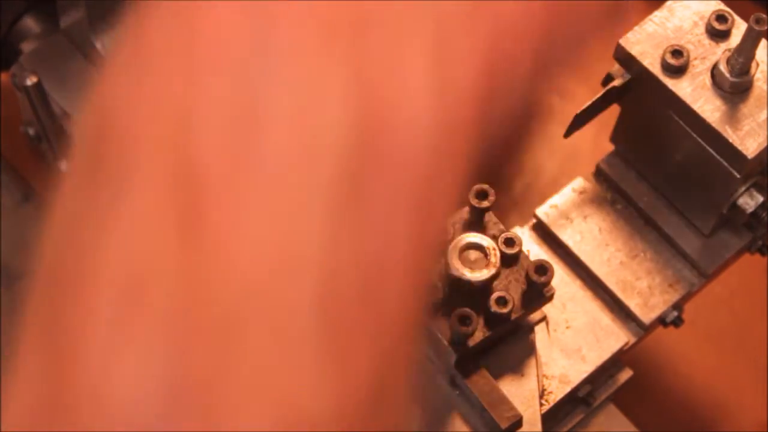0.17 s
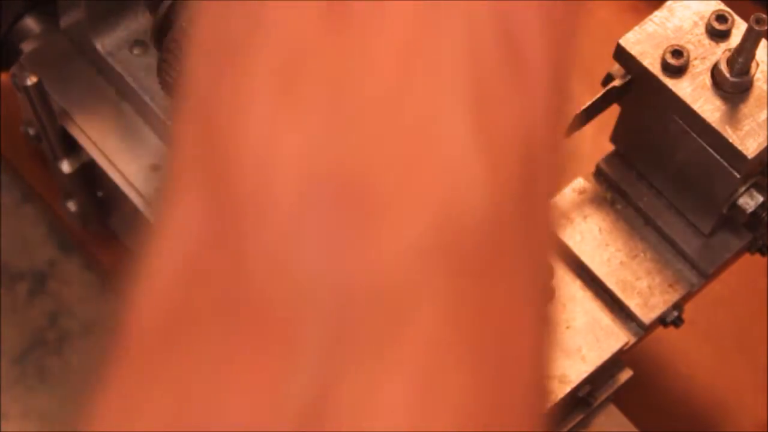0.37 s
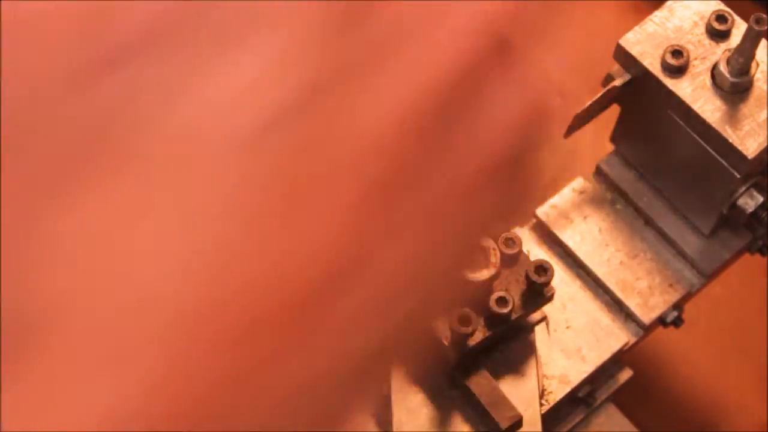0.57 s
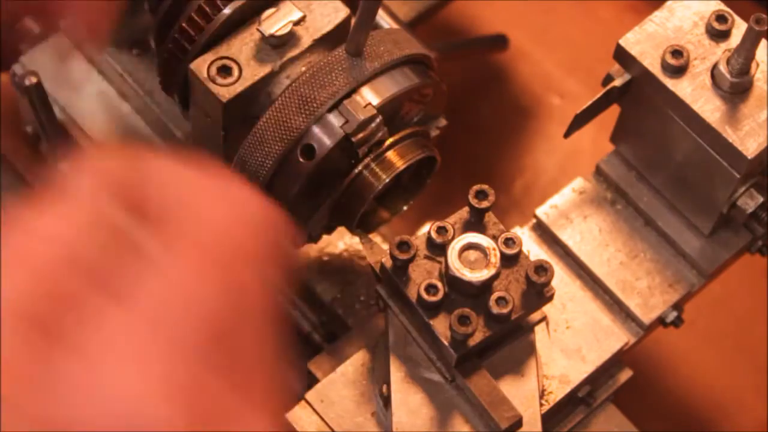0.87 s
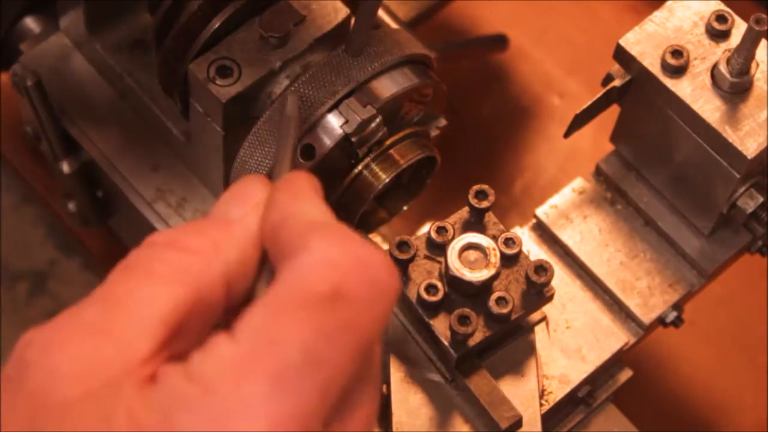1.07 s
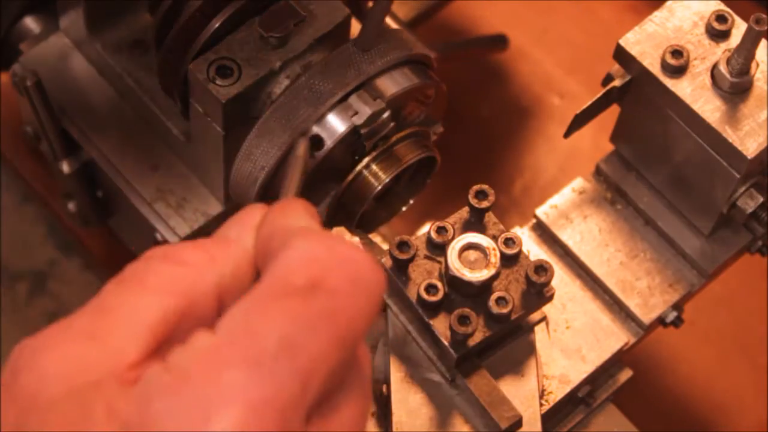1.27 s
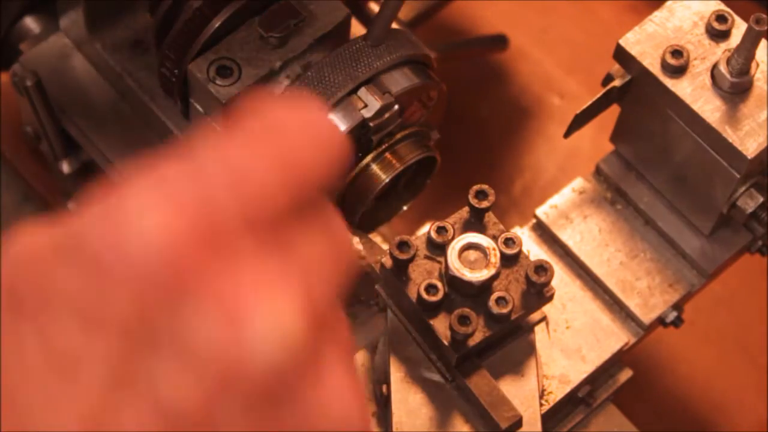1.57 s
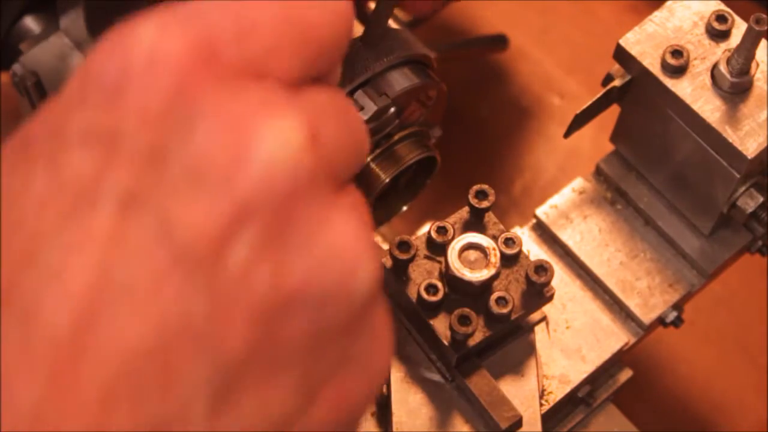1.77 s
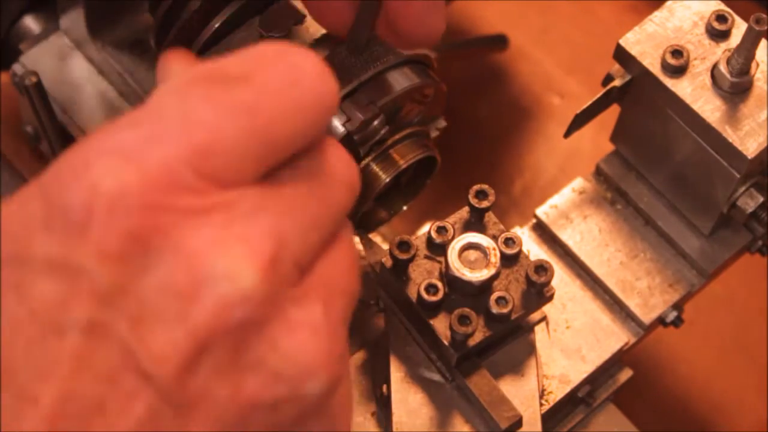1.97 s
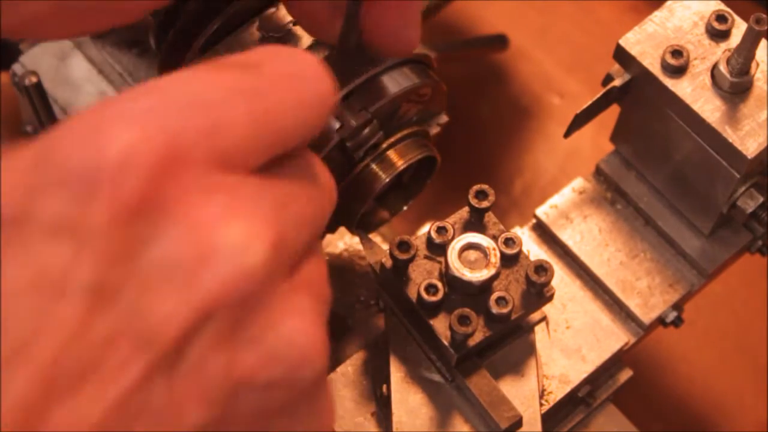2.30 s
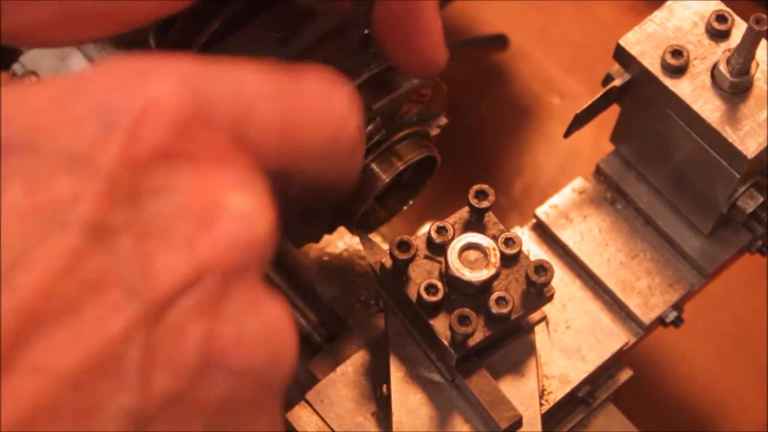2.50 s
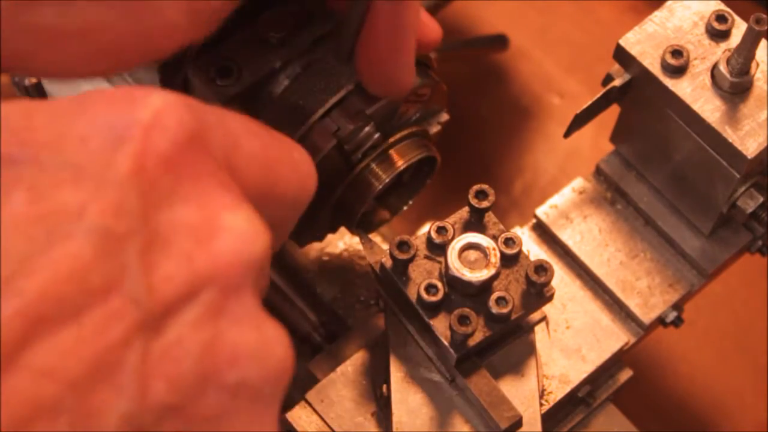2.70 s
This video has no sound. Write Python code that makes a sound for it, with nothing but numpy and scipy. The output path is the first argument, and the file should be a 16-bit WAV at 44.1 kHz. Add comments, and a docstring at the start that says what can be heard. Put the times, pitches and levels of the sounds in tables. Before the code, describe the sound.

Metallic clicks and dull clunks as hands fit a thin steel bar into a stopped lathe chuck

```python
"""A quiet workshop, close to the chuck of a stopped bench lathe: hands fit a thin steel bar into it.
Ticks are noise cracks, with decaying rings of the chuck and bar beside them; scrapes and midrange clacks
are bursts of dense grit clicks. The spindle housing answers with dull knocks (short shudders into low
modes), the hand thumps softly (puffs of bass noise), and skin and sleeve rustle as treble noise.
Mains hum (a wavering sine), room rumble and microphone hiss (shaped noise) lie underneath."""
import sys
import numpy as np
from scipy import signal
from scipy.fft import rfft, irfft
from scipy.io import wavfile
from scipy.ndimage import uniform_filter1d

SR = 44100
rng = np.random.default_rng(int(sys.argv[2]) if len(sys.argv) > 2 else 0)


def bounce(signal):
    """Save signal as a 16-bit WAV file at the path given by the first command-line argument."""
    frames = np.transpose(np.atleast_2d(signal))
    limited = np.clip(frames, -1, 1)
    pcm = np.round(limited * 32767).astype(np.int16)
    wavfile.write(sys.argv[1], SR, pcm)


def gain_from_db(level_db):
    """Turn a decibel level (scalar or array-like) into a linear amplitude factor."""
    decades = np.asarray(level_db, float) / 20
    return 10 ** decades


N = 125685

# vibration modes of the steel chuck: f/Hz, level/dB
CHUCK_MODES = [(1750, -12.5), (2105, -8.5), (2380, -14.5), (2600, -12.5), (2710, -7), (3100, -16.5),
               (3380, -13.5), (3700, -11.5), (4300, -9), (4900, -10), (7000, -15.5), (7400, -16),
               (7750, -10), (8350, -13), (9500, -11.5), (10800, -16), (12100, -41.5), (12900, -18.5),
               (14200, -17), (15000, -17)]


def colour(x, hz, octaves):
    """Bell-shaped emphasis around hz on a log axis, rms 1."""
    f = np.fft.rfftfreq(len(x), 1 / SR) + 1
    bell = np.exp(-.5 * (np.log2(f / hz) / octaves) ** 2)
    y = irfft(rfft(x) * bell, len(x))
    return y / np.sqrt(np.mean(y ** 2))


def ring(x, modes):
    """Every mode (f/Hz, level/dB, t60/s) is a decaying sine that x strikes."""
    out = 0
    for hz, db, t60 in modes:
        pole = np.exp(2j * np.pi * hz / SR - np.log(1000) / (t60 * SR))
        out = out + gain_from_db(db) * signal.lfilter([1], [1, -pole], x).imag
    return out


def add(out, s, x):
    """Mix x into out from time s."""
    i = int(s * SR)
    out[i:i + len(x)] += x[:N - i]


def walk(rate):
    """Slow random curve through rate points per second, spread about 1."""
    curve = np.interp(np.arange(N) * rate / SR, np.arange(200), rng.standard_normal(200))
    return uniform_filter1d(curve, int(SR / rate / 2)) * 1.12


def hiss():
    """Near-steady microphone and room noise, shaped over frequency."""
    # spectrum of the noise floor, relative: f/Hz, level/dB per Hz
    spectrum = [(15, -48), (25, -11), (40, -18), (58, -1), (72, -7.5), (87, -12), (110, -6), (159, -10.5),
                (197, -18), (238, -11), (273, -18.5), (349, -11), (634, -15.5), (1250, -20), (3230, -21.5),
                (8000, -25), (15600, -29.5), (16200, -52)]
    f = np.fft.rfftfreq(N, 1 / SR) + 1
    hz, db = np.array(spectrum).T
    shape = gain_from_db(np.interp(np.log(f), np.log(hz), db))
    noise = irfft(rfft(rng.standard_normal(N)) * shape, N)
    return noise / noise.std() * gain_from_db(-54 + .5 * walk(4.84))


def rumble():
    """A flickering low band of noise in the room."""
    level = gain_from_db(-63.5 + 2.5 * walk(9.44))
    return level * colour(rng.standard_normal(N), 366, 0.32)


def whine():
    """A faint, narrow band of noise in the room tone."""
    level = gain_from_db(-66 + 1.8 * walk(3.5))
    return level * colour(rng.standard_normal(N), 1300, 0.17)


def hum():
    """Mains hum: a sine of wavering pitch that swells and fades."""
    # swell of the hum, rms: t/s, level/dB
    swell = [(0.0, -74), (0.23, -54.5), (0.28, -82), (0.35, -56), (0.52, -63), (0.65, -89), (0.8, -61),
             (1.07, -57.5), (1.4, -71), (1.44, -68), (1.81, -56), (2.09, -74), (2.21, -58), (2.58, -60),
             (2.62, -84), (2.7, -54), (2.82, -84), (2.85, -76)]
    centre_hz, waver = 59, 0.035  # waver as a fraction of the pitch
    phase = np.cumsum(centre_hz * (1 + waver * walk(11.33))) * 2 * np.pi / SR
    level = gain_from_db(np.interp(np.arange(N) / SR, *np.array(swell).T))
    return np.sqrt(2) * level * np.sin(phase)


def rustle():
    """Skin and sleeve sliding over metal: flickering treble noise."""
    # level curve of each rustle, silent outside it: t/s, level/dB
    strokes = [
        [(0.8, -78), (0.802, -80), (0.852, -41), (0.874, -60), (0.9, -58)],
        [(0.9, -56), (0.99, -53.5), (1.066, -70), (1.08, -76)],
        [(1.5, -78), (1.508, -77), (1.588, -56), (1.62, -51)],
        [(1.73, -62), (1.77, -54), (1.79, -59), (1.9, -65)],
        [(2.27, -72), (2.288, -81), (2.324, -56), (2.346, -58), (2.402, -53), (2.42, -49), (2.436, -46.5),
         (2.5, -63)],
        [(2.575, -69), (2.627, -51.5), (2.649, -79), (2.655, -68)],
        [(2.74, -63), (2.748, -75), (2.782, -51.5), (2.822, -76), (2.83, -83)],
    ]
    t = np.arange(N) / SR
    gain = sum(gain_from_db(np.interp(t, *np.array(stroke).T, left=-200, right=-200)) for stroke in strokes)
    noise = colour(rng.standard_normal(N), 13500, .45)
    return gain * noise * gain_from_db(2.0 * walk(40.3))


def thumps():
    """A hand on the machine: soft, decaying puffs of bass noise."""
    # hand thumps: t/s, level/dB, f/Hz, t60/s
    hand_thumps = [(0.273, -44.5, 298, 0.14), (0.281, -41, 150, 0.061), (0.299, -43, 87, 0.18),
                   (2.371, -45, 108, 0.092), (2.621, -43, 280, 0.19), (2.623, -56, 175, 0.15),
                   (2.622, -46.5, 107, 0.3), (2.661, -42, 170, 0.053), (2.827, -52.5, 183, 0.1)]
    out = np.zeros(N)
    t = np.arange(SR // 4) / SR
    for s, db, hz, t60 in hand_thumps:
        noise = colour(rng.standard_normal(len(t)), hz, 0.27)
        onset = np.minimum(t * hz, 1)  # rises over one period
        add(out, s, gain_from_db(db - 60 * t / t60) * noise * onset)
    return out


def knocks():
    """Dull knocks: a short shudder sets the spindle housing ringing in its low modes."""
    # shudders that drive the housing: t/s, drive level/dB, length/s, f/Hz
    shudders = [(.005, -45, 0.0037, 580), (0.226, -39.5, 0.0018, 740), (.245, -32.5, 0.0036, 636),
                (.259, -28.5, 0.0048, 732), (.266, -29.5, 0.0055, 705), (.281, -40, 0.0082, 564),
                (0.648, -41.5, 0.00071, 960), (1.286, -36, 0.0051, 657), (1.294, -42, 0.00091, 690),
                (1.387, -32, 0.0091, 606), (1.398, -26, 0.0027, 994), (1.406, -32.5, 0.0044, 775),
                (1.432, -35, 0.012, 630), (1.613, -40, 0.0018, 605), (1.634, -23, 0.003, 726),
                (1.641, -24.5, 0.0055, 688), (1.657, -36, 0.0065, 796), (1.692, -26, 0.02, 614),
                (1.697, -37.5, 0.0047, 890), (1.711, -31, 0.0073, 783), (1.712, -25, 0.013, 600),
                (1.7205, -27, 0.0029, 810), (1.722, -29, 0.0085, 584), (1.759, -35, 0.0054, 470),
                (2.322, -44.5, 0.008, 610), (2.37, -44, 0.003, 600), (2.421, -47, 0.0011, 950),
                (2.5021, -37, 0.0021, 830), (2.515, -27.5, 0.01, 655), (2.529, -11.5, 0.016, 596.7),
                (2.528, -29, 0.011, 930), (2.5365, -21.5, 0.0021, 678), (2.551, -20, 0.016, 571),
                (2.553, -34, 0.0067, 920), (2.583, -38.5, 0.0067, 610), (2.604, -40, 0.0026, 613),
                (2.625, -35.5, 0.0052, 483), (2.64, -44, 0.0022, 620), (2.736, -43.5, 0.0049, 440),
                (2.835, -46, 0.0028, 580)]
    # vibration modes of the housing: f/Hz, level/dB, t60/s
    housing_modes = [(440, -7, 0.12), (580, -11.5, 0.16), (627.4, 5, 0.049), (652, -22, 0.057),
                     (757, 0.5, 0.048), (852, -7, 0.065), (915.6, -1, 0.066), (969, -5.5, 0.061),
                     (1200, -3, 0.043)]
    push = np.zeros(N)
    for s, db, length, hz in shudders:
        n = max(int(length * SR), 4)
        window = np.hanning(n + 2)[1:-1]
        shudder = window * np.sin(2 * np.pi * hz * np.arange(n) / SR)
        add(push, s, gain_from_db(db) * 2 / n * shudder)
    bass_cut = signal.butter(3, 370, "high", fs=SR, output="sos")
    return signal.sosfilt(bass_cut, ring(push, housing_modes))


def scrapes():
    """Scrapes and midrange clacks: bursts of dense grit clicks that rise and fall, direct and via the chuck."""
    # scrapes, and clacks that fill out ticks:
    # start t/s, rise/s, fall time constant/s, level/dB, centre f/Hz, width/octaves
    grit_bursts = [(0.189, 0.015, 0.031, -51, 1420, 1.7), (0.22, 0.0015, 0.035, -32.5, 5840, 2.14),
                   (.234, 0.02, 0.0044, -25.5, 5530, 1), (.26, 0.0049, 0.025, -37.5, 4700, 1.7),
                   (0.6489, 0.0011, 0.0072, -45, 1200, 0.6), (1.23, 0.018, 0.024, -59.5, 1300, 0.34),
                   (1.293, 0.0018, 0.012, -42.5, 1570, 0.89), (1.397, 0.0019, 0.017, -45, 1200, 0.19),
                   (1.432, 0.0013, 0.012, -42, 2440, 0.78), (1.6313, 0.00081, 0.0086, -49.5, 1350, 0.3),
                   (1.7, 0.021, 0.0059, -52, 2630, 0.14), (1.632, 0.00075, 0.034, -46, 3020, 0.6),
                   (2.183, 0.016, 0.044, -54, 1730, 1.35), (2.422, 0.0014, 0.014, -43.5, 3500, 1.4),
                   (2.505, 0.033, 0.036, -42, 3800, 2.8), (2.539, 0.0044, 0.0023, -34.5, 9000, 1.3),
                   (2.544, 0.009, 0.0035, -31, 9000, 4.5)]
    grits_per_s, grit_spread_db = 14000, 1.5
    chuck_t60_s, chuck_db = .032, -25.5
    out = np.zeros(N)
    t = np.arange(SR // 4) / SR
    for s, rise, fall, db, hz, octaves in grit_bursts:
        clicks = rng.random(len(t)) < grits_per_s / SR
        sizes = gain_from_db(grit_spread_db * rng.exponential(size=len(t))) * rng.standard_normal(len(t))
        swell = np.minimum(t / rise, np.exp(-np.maximum(t - rise, 0) / fall))
        add(out, s, gain_from_db(db) * colour(clicks * sizes, hz, octaves) * swell)
    through_chuck = ring(out, [(hz, db, chuck_t60_s) for hz, db in CHUCK_MODES])
    return out + gain_from_db(chuck_db) * through_chuck


def bar_rings():
    """The free bar rings: single impulses set off its own high modes."""
    # impulses on the bar: t/s, level/dB
    impulses = [(.222, -46), (0.243, -32), (.250, -33), (.261, -26), (0.648, -35), (1.287, -46),
                (1.3945, -19.5), (1.405, -47), (1.41, -30.5), (1.44, -53)]
    # vibration modes of the bar: f/Hz, level/dB, t60/s
    bar_modes = [(10200, -7, 0.015), (10250, -5, 0.051), (10670, -5, 0.041), (11000, -24, 0.021)]
    strike = np.zeros(N)
    for s, db in impulses:
        strike[int(s * SR)] = gain_from_db(db)
    return ring(strike, bar_modes)


def chuck_ring(t, ring_db, ring_hz, t60):
    """Decaying sines at the chuck modes, strongest near ring_hz, randomly weighted and detuned each time."""
    width_octaves, spot_db, detune, onset_s = 0.24, 2, 0.016, .0003
    out = np.zeros(len(t))
    spots = rng.standard_normal((len(CHUCK_MODES), 3))  # each contact spot favours other modes
    for (hz, mode_db), (weight, shift, phase) in zip(CHUCK_MODES, spots):
        nearness = np.exp(-.5 * (np.log2(hz / ring_hz) / width_octaves) ** 2)
        gain = gain_from_db(ring_db + mode_db + spot_db * weight - 60 * t / t60) * nearness
        sine = np.sin(2 * np.pi * (hz * (1 + detune * shift) * t + phase))
        out += gain * np.minimum(t / onset_s, 1) * sine
    return out


def ticks():
    """Hard ticks: a noise crack with a hissing tail and the room's short tail, and a chuck ring beside it."""
    # ticks, and at 1.3928 s a faint treble hiss just before the tick:
    # t/s, crack level/dB, colour f/Hz, hiss tail level/dB re crack,
    # chuck ring level/dB, ring centre f/Hz, ring t60/s
    cracks = [(.2200, -37, 6000, -10, -23, 4750, 0.028), (0.223, -40, 9000, -21, -17, 7260, 0.011),
              (.2382, -39, 7500, -22, -15, 7340, .014), (0.2572, -28, 8500, -28, 2.5, 8700, 0.005),
              (.2571, -15.5, 4500, -20, -3, 15000, 0.01), (.2585, -35, 3000, -23, -22.5, 2670, 0.044),
              (.6485, -37, 2900, -14, -42, 4060, .03), (1.265, -50, 13000, -3, -60, 9000, .03),
              (1.2850, -50, 11000, -14, -37.5, 2600, 0.046), (1.294, -34.5, 11000, -16, -24.5, 2930, 0.032),
              (1.328, -46, 13000, -25, -64, 9000, .03), (1.3928, -35, 9000, 7, -42, 7000, .02),
              (1.3956, -16.5, 9900, -27, -13, 8600, .012), (1.3963, -22.5, 12000, -11, -1, 12000, 0.0092),
              (1.3972, -22, 11000, -18, -29.5, 2620, 0.065), (1.4286, -40, 9000, -8, -45, 9000, .02),
              (1.4322, -37, 7000, -10, -25, 3400, 0.031), (1.6315, -18, 8900, -18, -16.5, 3430, 0.024),
              (1.6335, -40, 3120, -16, -24.5, 2500, 0.058), (1.6319, -20, 14000, -22, -12, 14800, 0.044),
              (1.632, -34, 8000, -10, -13.5, 7700, 0.024), (1.65, -49, 8300, -6, -29, 8200, 0.039),
              (1.717, -45, 8000, -20, -36.5, 8400, 0.037), (2.4206, -25, 12300, -25, -62, 3000, .03),
              (2.4211, -25.5, 2220, -31, -52, 4500, 0.026), (2.5272, -51, 5000, -18, -44, 4000, 0.035),
              (2.5417, -40, 9000, -12, -44, 7500, .03), (2.5513, -51, 9000, -18, -31.5, 2670, 0.065),
              (2.733, -52, 11000, 2.5, -47, 9000, .03)]
    crack_s, crack_octaves = .0003, 1.1
    hiss_t60_s, room_db, room_t60_s = .075, -30, 0.32
    out = np.zeros(N)
    t = np.arange(SR // 4) / SR
    blow = t / crack_s * np.exp(1 - t / crack_s)
    for s, db, hz, tail_db, ring_db, ring_hz, t60 in cracks:
        noise = colour(rng.standard_normal(len(t)), hz, crack_octaves)
        # every crack carries the energy of the smooth blow
        crack = blow * np.linalg.norm(blow) / np.linalg.norm(noise * blow)
        tail = gain_from_db(tail_db - 60 * t / hiss_t60_s) + gain_from_db(room_db - 60 * t / room_t60_s)
        add(out, s, gain_from_db(db) * noise * (crack + tail))
        add(out, s, chuck_ring(t, ring_db, ring_hz, t60))
    return out


def scene():
    """Everything reaches one microphone close to the chuck."""
    background = hiss() + rumble() + whine() + hum()
    hands = rustle() + thumps() + knocks()
    steel = scrapes() + bar_rings() + ticks()
    return (background + hands + steel)[None]


def top_cut(x):
    """Nothing passes above the cut-off."""
    return signal.sosfilt(signal.butter(12, 16820, fs=SR, output="sos"), x)


def record(dry):
    """The camera cuts the top above 16 kHz with a steep low-pass."""
    low_pass = signal.cheby1(10, .5, 16000, fs=SR, output="sos")
    mix = signal.sosfilt(low_pass, dry)
    return top_cut(mix)


dry = scene()
out = record(dry)
bounce(out)
```